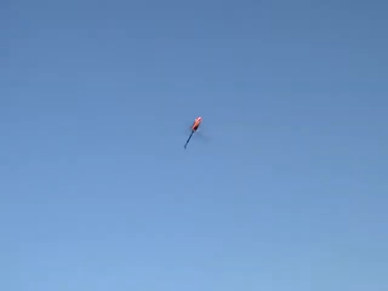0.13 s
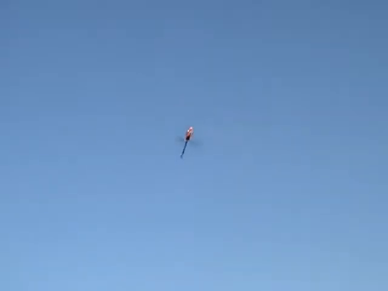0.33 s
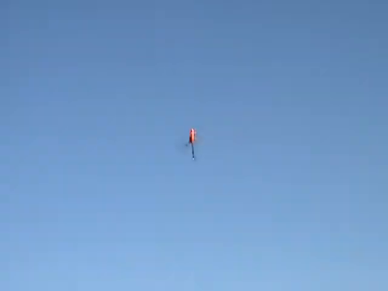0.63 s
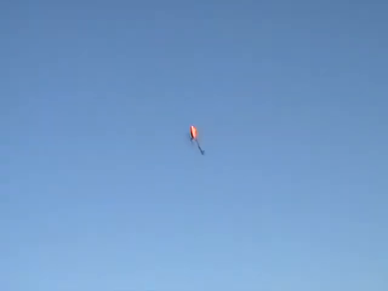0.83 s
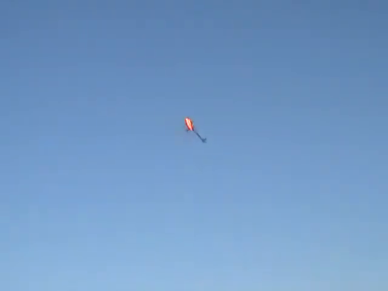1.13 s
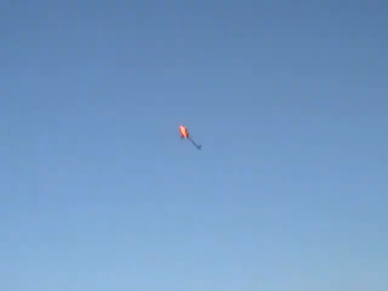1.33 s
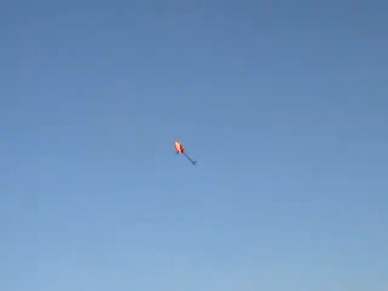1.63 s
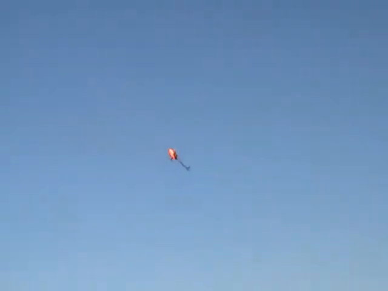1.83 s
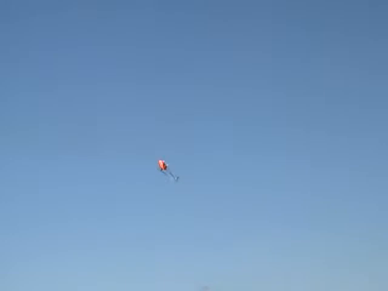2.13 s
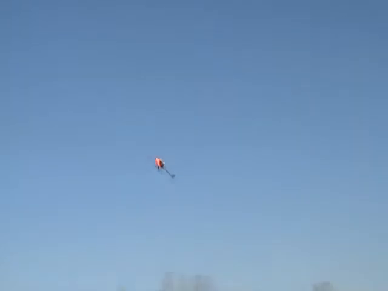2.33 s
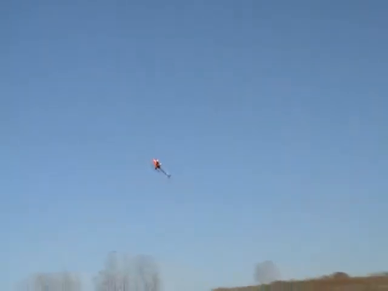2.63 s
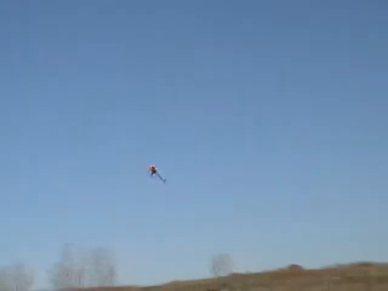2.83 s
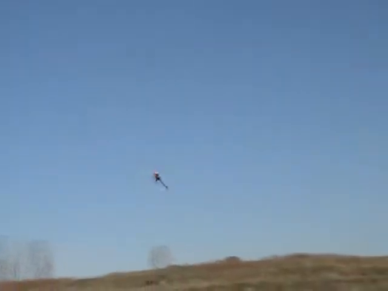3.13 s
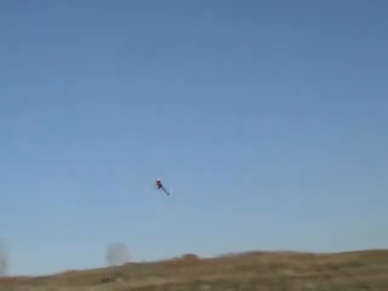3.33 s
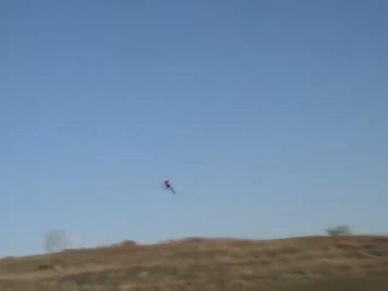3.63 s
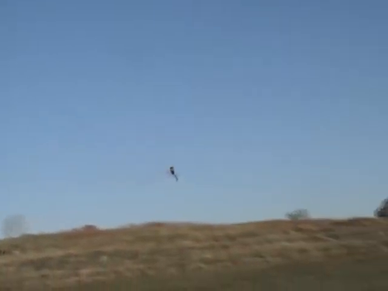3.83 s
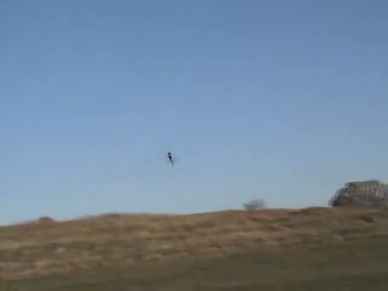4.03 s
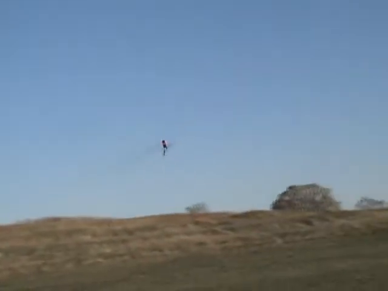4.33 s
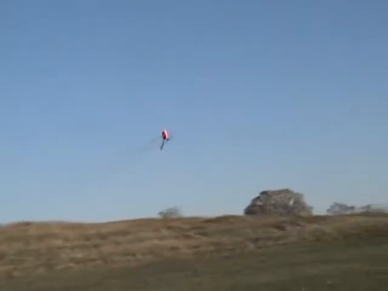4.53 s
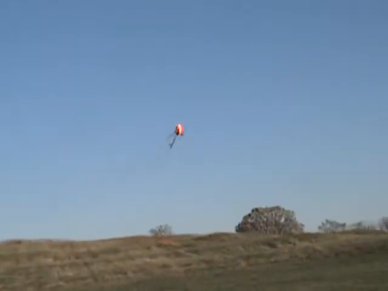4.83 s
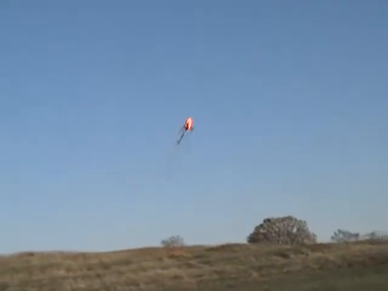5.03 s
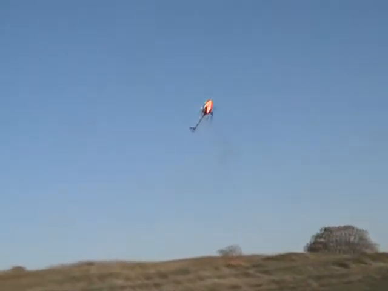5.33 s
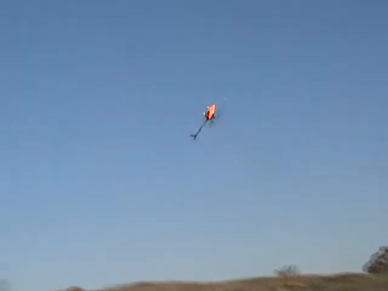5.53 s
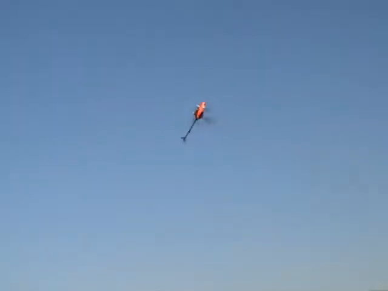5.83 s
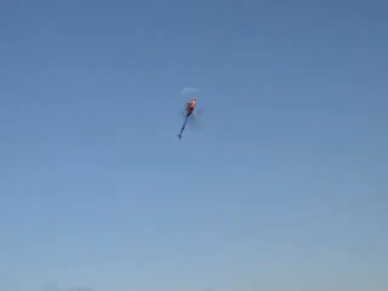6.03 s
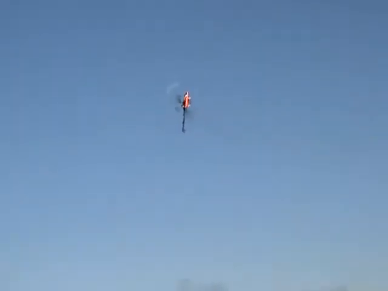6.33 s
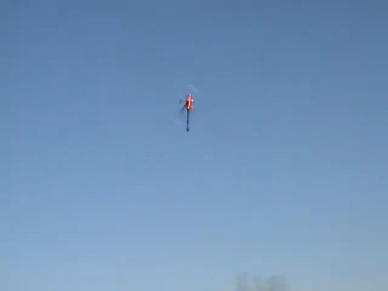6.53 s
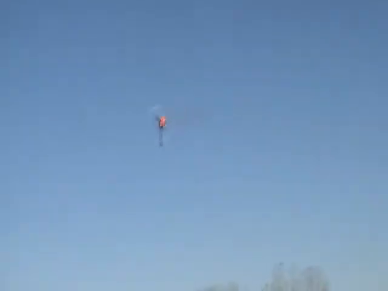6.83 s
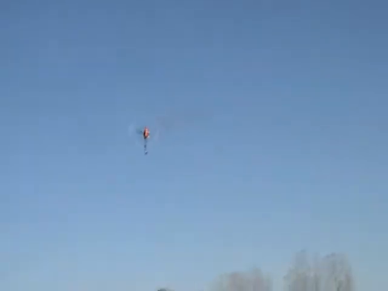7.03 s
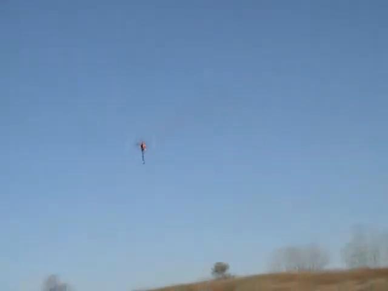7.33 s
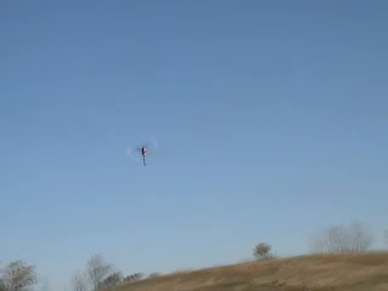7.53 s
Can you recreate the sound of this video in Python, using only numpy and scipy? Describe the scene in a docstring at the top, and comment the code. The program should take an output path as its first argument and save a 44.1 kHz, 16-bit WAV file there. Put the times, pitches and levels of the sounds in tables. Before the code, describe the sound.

A model helicopter's engine buzzes and its gears whine outdoors, the pitch sagging in a hard turn then recovering with slapping blades, under gusty wind rumble.

```python
"""A glow-fuel model helicopter flies over a grass field in wind; one crankshaft speed drives all its periodic tones.
It first descends, so its ground echo shortens until 3.9 s, while the wind drops; then it climbs and the echo lengthens.
Near 5 s the crankshaft is fastest and the exhaust pulses, with their rasp, tones and hiss, have their sharpest edge.
Near 6.6 s the speed sags as the blades bite the air in a hard turn; wind has returned to the microphone.
As the speed recovers, the wash of the rotor slaps hardest, near 7.3 s; gear teeth whine throughout."""
import sys
import numpy as np
from scipy.fft import rfft, irfft, next_fast_len
from scipy.io import wavfile
from scipy.ndimage import uniform_filter1d, map_coordinates

SR = 44100
rng = np.random.default_rng(int(sys.argv[2]) if len(sys.argv) > 2 else 0)


def materialize(psi):
    """Save the field psi as 16-bit PCM at rate SR to the path in sys.argv[1].

    A 1-D psi becomes a single channel; in a 2-D psi each row is a channel.
    """
    bounded = np.clip(np.atleast_2d(psi).T, -1, 1)
    quanta = np.round(bounded * 32767).astype(np.int16)
    wavfile.write(sys.argv[1], SR, quanta)


N = 339129

# turns per crankshaft turn of each rotor, teeth on the pinion, crankshaft speed in cruise [Hz]
MAIN_RATIO, TAIL_RATIO, TEETH, CRUISE_HZ = 2 / 17, 9 / 17, 10, 294.6


def amp(db):
    """Decibel law: level in dB to amplitude ratio."""
    return 10 ** (np.asarray(db) / 20)


def unit(x):
    """Normalization: scale to an rms of 1."""
    return x / np.sqrt(np.mean(x ** 2) + 1e-20)


def along(points, hz):
    """Logarithmic frequency scale: read (frequency [Hz], value) points at hz."""
    f, v = np.transpose(points)
    return np.interp(np.log(hz + 1), np.log(f + 1), v)


def course(points):
    """Linear interpolation in time: (time [s], value) points to one value per sample."""
    s, v = np.transpose(points)
    return np.interp(np.arange(N) / SR, s, v)


def level(points):
    """Amplitude envelope: gain from (time [s], level [dB]) points."""
    return amp(course(points))


def wobble(rate):
    """Band-limited fluctuation: a smooth random curve with rate knots a second."""
    coarse = np.arange(0, N + 32, 32)  # every 32nd sample is enough for a slow curve
    knots = rng.standard_normal(int(N * rate / SR) + 4)
    curve = map_coordinates(knots, [coarse * rate / SR], mode="nearest")
    return np.interp(np.arange(N), coarse, curve)


def filtered(x, response):
    """Linear filtering: multiply the spectrum of x by a response of frequency."""
    m = next_fast_len(N + SR // 4)
    return irfft(rfft(x, m) * response(np.fft.rfftfreq(m, 1 / SR)), m)[..., :N]


def noise(spectrum):
    """Spectral shaping: white noise coloured by (frequency [Hz], level [dB]), rms 1."""
    return unit(filtered(rng.standard_normal(N), lambda hz: amp(along(spectrum, hz))))


def partials(angle, table, fade_db):
    """Fourier synthesis: harmonics of a turning part, each fading on its own in the moving air."""
    total = 0
    for k, db in table:
        gain = amp(db + fade_db * wobble(4.03))
        total = total + gain * np.cos(k * angle + rng.uniform(0, 2 * np.pi))
    return unit(total)


def bursts(angle, share, sharpness):
    """Periodic amplitude modulation: mean power 1, a share of it gathered in one burst per cycle."""
    peak = np.exp(sharpness * (np.cos(angle) - 1))
    share = np.clip(share, 0, 1)
    return np.sqrt(1 - share + share * peak / peak.mean())


# wind buffeting: (time [s], level [dB])
WIND_LEVEL = [(0, -18.5), (.7, -21), (1.4, -20), (1.62, -17), (1.92, -20.5), (2.2, -32.5), (2.38, -40),
              (2.55, -29), (2.78, -33), (3, -23.5), (3.45, -29), (3.8, -47), (4.05, -38), (4.7, -57.5),
              (5.2, -43), (5.58, -43.5), (5.72, -34), (6.05, -22), (6.5, -26), (6.75, -14.5), (7.2, -20.5),
              (7.69, -12)]
# relative spectra of the gust eddies and of the steady breeze: (frequency [Hz], level per Hz [dB])
EDDY_SPECTRUM = [(15, -38), (35, -17.5), (60, -6.5), (100, 1), (160, 2), (250, -6), (400, -12), (700, -21),
                 (1500, -37.5), (6000, -69.5)]
BREEZE_SPECTRUM = [(15, -11.5), (30, -6.5), (55, 2), (100, 1.5), (170, -13), (400, -36.5), (2000, -68.5)]
GUST_DB, GUSTS_PER_S = 1.2, 6.7  # quick gusts on top of the wind


def wind():
    """Turbulent pressure: a breeze rumbles on both ports, gusts add brighter eddies, harder on the right."""
    buffet_db = course(WIND_LEVEL) + GUST_DB * wobble(GUSTS_PER_S)

    def eddies():
        """Intermittent turbulence: eddy noise that swells and fades at random."""
        return amp(buffet_db + 1) * unit(noise(EDDY_SPECTRUM) * amp(1.8 * wobble(22)))

    # the deep rumble follows the gusts only partly
    breeze = amp(0.5 * buffet_db - 18.0) * noise(BREEZE_SPECTRUM)
    right = eddies() + breeze
    # phase lead of the left port: (frequency [Hz], phase [rad])
    lead = [(40, 1.2), (130, 2.02), (400, 1.78)]
    left = filtered(right, lambda hz: np.exp(1j * along(lead, hz)))
    return np.array([amp(-7.0) * left + amp(-11.0) * eddies(), right])


# delay of the ground echo: (time [s], delay [s])
ECHO_DELAY = [(0, 0.00415), (.25, 0.00394), (1, 0.003416), (2, 0.00247), (3, 0.001615), (3.9, 0.001057),
              (4.3, 0.001136), (4.8, 0.00141), (5.3, 0.001884), (5.8, 0.002597), (6.5, 0.003125),
              (7.69, 0.002105)]


def over_ground(x, reflection):
    """Comb interference: the ground returns a copy, later the higher the helicopter; grass dulls it."""
    grass = [(1800, 0), (3500, -5.0), (6000, -8)]  # (frequency [Hz], level [dB])
    dull = filtered(x, lambda hz: amp(along(grass, hz)))
    echo = np.interp(np.arange(N) - course(ECHO_DELAY) * SR, np.arange(N), dull)
    return x + reflection * echo


# left port over right port: (frequency [Hz], level difference [dB])
PORT_LEVEL = [(60, 9), (130, 21.5), (250, 19.5), (400, 28), (750, 13.5), (1100, 10), (1500, 5.5),
              (2100, 5.5), (3000, 0.5), (3700, 6), (4500, 0.5), (6100, -1)]
# phase lead of the left port: (frequency [Hz], phase [rad])
PORT_PHASE = [(60, 0), (260, -2.9), (520, -2.3), (860, -1.6), (1400, -1.5), (2000, -1.15), (2700, -1.2),
              (3400, -.6), (3900, -1.1), (4600, -.7), (6300, -.68)]


def at_ports(x):
    """Interaural-like differences: two ports hear the same sound with different level and phase."""
    def response(hz):
        """Transfer functions: left and right, with a mean of 1."""
        ratio = amp(along(PORT_LEVEL, hz)) * np.exp(1j * along(PORT_PHASE, hz))
        return 2 * np.array([ratio, np.ones_like(ratio)]) / (1 + ratio)
    return filtered(x, response)


# brief flares (+) and fades (-), before each layer scales them: (time [s], width at 1/e [s], level [dB])
FLARES = [(1.45, .06, -4), (1.665, 0.14, 6), (2.39, .06, -5), (2.64, 0.11, 3), (2.751, 0.046, -4.5),
          (2.94, 0.064, 5), (3.113, 0.087, -7), (3.18, 0.064, 2), (3.304, 0.1, -4.5), (3.588, 0.052, 2.5),
          (3.681, 0.059, -5), (3.774, 0.092, 5.5), (3.879, 0.065, -3.5), (3.978, 0.059, 4.5),
          (4.337, 0.056, 4.5), (4.541, 0.066, 6), (5.527, 0.21, 5.5)]
FLICKER_DB, FLICKERS_PER_S = 1.1, 9


def flares():
    """Fluctuation in moving air: bell-shaped rises and fades of whine and hiss in dB, plus a flicker."""
    t = np.arange(N) / SR
    brief = sum(db * np.exp(-(2 * (t - s) / width) ** 2) for s, width, db in FLARES)
    return brief + FLICKER_DB * wobble(FLICKERS_PER_S)


# crankshaft speed as heard, before inertia smooths it: (time [s], speed [Hz])
SPEED = [(0.0, 292.4), (0.2, 295.2), (0.4, 294.8), (1.04, 284.6), (1.28, 283.3), (2.12, 287.3), (2.56, 285),
         (3.36, 286), (4.12, 290), (4.64, 298.4), (4.84, 300.7), (5.08, 302.8), (5.28, 300.4),
         (5.52, 298.3), (5.68, 296.6), (5.92, 291.7), (6.04, 288.4), (6.16, 282.7), (6.36, 263),
         (6.44, 255.4), (6.52, 252.3), (6.6, 250.8), (6.68, 253.1), (6.72, 254.4), (6.96, 272.1),
         (7.16, 282.7), (7.44, 289.9), (7.68, 291)]
INERTIA_S = 0.075  # the rotor's mass rounds off every change of speed
HUNT_HZ, HUNTS_PER_S = 0.3522, 6  # the speed hunts a little about its course


def crankshaft_speed():
    """Rotational inertia: a smoothed course of speed in Hz, with slight hunting."""
    smooth = uniform_filter1d(course(SPEED), int(INERTIA_S * SR), mode="nearest")
    return smooth + HUNT_HZ * wobble(HUNTS_PER_S)


# bite of the main blades, over easy flight: (time [s], level [dB])
BITE = [(0, 3), (.33, 5.5), (.5, 10), (.95, -1), (1.4, -5.5), (2.6, -1.5), (3.25, 0.5), (3.55, 7), (4.2, 1),
        (4.6, 3.5), (5.15, -2), (5.6, 4), (6.1, 11), (6.55, 7), (7.13, 11.5), (7.27, 3.5), (7.52, 2),
        (7.69, -1.5)]
# share of the wash that comes in slaps: (time [s], share [1])
SLAP = [(0, 0.29), (.5, .3), (1.3, .12), (2.6, .12), (3.7, .42), (4.5, .45), (5.8, .17), (6.2, 0.29),
        (6.5, 0.67), (6.75, 0.53), (7, .72), (7.3, 1), (7.69, 0.29)]
# relative spectra of dull wash and bright swish: (frequency [Hz], level per Hz [dB])
WASH_SPECTRUM = [(60, -33), (200, -17.5), (330, -2.5), (470, -5), (680, 2), (820, -3), (980, -4),
                 (1300, -7), (2500, -47.5)]
SWISH_SPECTRUM = [(400, -29.5), (900, -17), (1150, 1.5), (1350, -1), (1750, -0.5), (2300, -4), (3000, -8.5),
                  (4200, -14), (7000, -33)]
# level in easy flight [dB] and growth [dB per dB of bite]
WASH_DB, WASH_GROWS, SWISH_DB, SWISH_GROWS = -35, 1.03, -30, 0.71
STALL_DB_PER_HZ = 0.06  # shift from swish to wash per Hz below cruising crankshaft speed
# main rotor at blade rate, at twice that, and overtones, beamed as the disc tilts: (time [s], level [dB])
THUMP = [(0, -43.5), (3.4, -47.5), (4.1, -59.5), (4.7, -54), (5.1, -47), (5.7, -44.5), (6.25, -33),
         (6.6, -40), (7.69, -44)]
THROB = [(0, -41.5), (2.4, -46.5), (3.6, -40.5), (5.6, -42.5), (6.3, -36), (7.69, -38.5)]
DRONE = [(0, -29.5), (.6, -40.5), (1.5, -45), (2.8, -56.5), (3.7, -48), (4.3, -38), (5.1, -40), (5.5, -38),
         (5.85, -30.5), (6.35, -28.5), (6.8, -37), (7.69, -37.5)]
# tail rotor at blade rate, and overtones, beamed as the disc tilts: (time [s], level [dB])
TAIL_HUM = [(0, -39), (.9, -43), (1.3, -41), (2.8, -50), (3.5, -43.5), (4.2, -36), (5.2, -43), (6.3, -36),
            (7.69, -39)]
TAIL_BUZZ = [(0, -42), (.6, -38.5), (1.2, -41.5), (2.1, -44), (3.1, -35.5), (4.3, -43), (4.9, -35.5),
             (5.4, -28), (6, -30), (6.7, -44), (7.1, -34), (7.69, -39)]
# relative overtones: (multiple of blade rate [1], level [dB])
MAIN_OVERTONES = [(3, -7.5), (4, -1), (5, 0.5), (6, -12.5), (7, -17.5)]
TAIL_OVERTONES = [(2, -0.5), (3, -6), (4, -1), (5, -6), (6, -6.5), (10, -8.5)]


def rotors(crank, speed):
    """Blade-passing radiation: two blades per rotor give a drone, a tail buzz and a throbbing wash."""
    blade = 2 * MAIN_RATIO * crank
    tail = 2 * TAIL_RATIO * crank
    tones = level(TAIL_HUM) * unit(np.cos(tail))
    tones += level(TAIL_BUZZ) * partials(tail, TAIL_OVERTONES, fade_db=1.5)
    tones += level(THUMP) * unit(np.cos(blade)) + level(THROB) * unit(np.cos(2 * blade))
    tones += level(DRONE) * partials(blade, MAIN_OVERTONES, fade_db=3.5)
    bite_db = course(BITE)
    # a rotor dragged below cruising speed trades bright swish for dull wash
    stall_db = STALL_DB_PER_HZ * np.maximum(CRUISE_HZ - speed, 0)
    # no two blades meet the wake equally hard
    strike = course(SLAP) * amp(1.1 * wobble(60))
    wash_gain = amp(WASH_DB + WASH_GROWS * bite_db + stall_db)
    wash = wash_gain * noise(WASH_SPECTRUM) * bursts(blade, strike, sharpness=8.5)
    swish_gain = amp(SWISH_DB + SWISH_GROWS * bite_db - stall_db + 1.1 * wobble(8))
    swish = swish_gain * noise(SWISH_SPECTRUM) * bursts(blade, 0.45 * strike, sharpness=10.0)
    # the swish also pulses once per crankshaft turn
    return tones + wash + swish * bursts(crank, share=0.24, sharpness=5.7)


# exhaust hiss, before the 6.5 dB added in jet: (time [s], level [dB])
HISS_LEVEL = [(0, -29.5), (.45, -30.5), (1, -37), (1.4, -35.5), (1.8, -30.5), (2.4, -32.5), (3.5, -29),
              (4.2, -35.5), (4.65, -30.5), (5.1, -32.5), (5.6, -26.5), (6.2, -29), (6.7, -33), (7.3, -37),
              (7.69, -37)]
# relative spectrum of the hiss: (frequency [Hz], level per Hz [dB])
HISS_SPECTRUM = [(1200, -25), (2400, -6), (3200, 1), (3700, -2), (4400, 0.5), (5100, -2.5), (5700, 4.5),
                 (6300, -1), (7200, 1.5), (12000, -5)]
# part that repeats with every pair of firings, over the rest: (time [s], level [dB])
REGULAR = [(0, -13.5), (1, -7.5), (2.2, -7.5), (3.2, -6), (4, -12), (4.7, -4), (5.4, -5), (6.2, -7.5),
           (7.69, -10.5)]
FLARE_IN_HISS = 0.65  # the hiss takes this much of each flare


def jet(crank, flare_db):
    """Pulsed jet noise: gas hisses out in a puff each turn; what the puffs share makes a fine buzz."""
    hiss_db = course(HISS_LEVEL) + FLARE_IN_HISS * flare_db
    puffs = bursts(crank, share=0.1, sharpness=1.0) * bursts(crank / 2, share=0.27, sharpness=1.6)
    orders = np.arange(15, 46) / 2  # multiples of crankshaft speed
    buzz_table = [(k, along(HISS_SPECTRUM, k * CRUISE_HZ)) for k in orders]
    buzz = partials(crank + 0.015 * wobble(60), buzz_table, fade_db=2.5)
    regular = level(REGULAR)
    mixed = (noise(HISS_SPECTRUM) * puffs + regular * buzz) / np.hypot(1, regular)
    return amp(hiss_db + 6.5) * mixed


# pinion on the main gear, at the tooth rate and at its overtones: (time [s], level [dB])
MESH = [(0, -31), (.48, -38), (.66, -30), (.82, -43), (1.4, -39.5), (1.62, -32.5), (2.55, -39), (2.85, -57),
        (3.4, -31.5), (3.76, -25), (4.55, -27.5), (5.2, -38.5), (5.6, -21.5), (5.76, -33.5), (6.38, -30.5),
        (6.56, -45.5), (6.9, -44), (7.08, -33), (7.34, -28.5), (7.46, -46), (7.6, -29.5), (7.69, -41)]
WHINE = [(0, -29.5), (.48, -29), (.66, -48), (.8, -28), (1.28, -32.5), (1.6, -29.5), (2.1, -37.5),
         (2.86, -24), (3.5, -19.5), (4.16, -18), (4.3, -29), (4.45, -29), (4.9, -16.5), (5.35, -25.5),
         (5.9, -27), (6.55, -27), (6.96, -23.5), (7.08, -29), (7.29, -26), (7.38, -44), (7.69, -43.5)]
# swing of the tooth phase by each firing, and by the limp of strong and weak ones: (time [s], phase [rad])
JERK = [(0, .35), (2.2, 0.12), (2.9, 0.053), (4.2, 0.067), (5, 0.17), (5.5, 0.46), (6.1, 0.45), (6.3, .6),
        (6.42, .55), (6.55, .36), (6.8, .4), (7.2, .15), (7.69, .15)]
LIMP = [(0, 0.35), (2.9, 0.16), (3.8, 0.13), (4.3, 0.19), (4.85, 0.34), (5.5, 0.41), (6.3, .14), (7, 0.18),
        (7.69, .25)]
# rattle of the teeth in their backlash: (time [s], phase [rad])
BACKLASH = [(0, 0.54), (1, 0.49), (2.6, 0.23), (5.2, 0.31), (5.9, .5), (6.2, 0.61), (6.4, .42), (6.55, .2),
            (6.95, .22), (7.07, .5), (7.25, 0.27)]
# tightening (+) or slackening (-) of the tooth contact by each firing: (time [s], fraction [1])
LOAD = [(0, .5), (.6, .1), (5.1, 0.18), (5.7, -0.045), (6.05, .1), (6.3, 0.43), (6.45, .5), (6.6, -0.49),
        (6.85, -0.26), (7, 0.27), (7.69, -0.27)]
FADE_DEEPER = 1.54  # a pure tone drops out deeper than the hiss does


def gears(crank, flare_db):
    """Gear-mesh modulation: runout, firing jerks and backlash sway the tooth phase; load varies its level."""
    jerk, limp = course(JERK), course(LIMP)
    runout = .2 * np.sin(MAIN_RATIO * crank)  # the main gear runs out of true
    sway = runout + limp * np.sin(crank / 2) + jerk * np.sin(crank)
    backlash = course(BACKLASH) * wobble(55) + .2 * wobble(300)
    mesh = TEETH * crank + sway + backlash
    overtones = np.cos(2 * mesh) + amp(-3) * np.cos(3 * mesh) + amp(-6) * np.cos(4 * mesh)
    chatter = unit(amp(1.6 * wobble(260)))
    first_db = course(MESH) + 1.4 * wobble(14)
    flare_in_whine = np.minimum(flare_db, FADE_DEEPER * flare_db)
    second_db = course(WHINE) + flare_in_whine + 1.7 * wobble(25)
    whine = amp(first_db) * unit(np.cos(mesh)) + amp(second_db) * unit(overtones) * chatter
    load = 1 + course(LOAD) * np.cos(crank) - .3 * limp * np.cos(crank / 2)
    flutter = unit(amp(1.03 * wobble(50)))
    return whine * load * flutter * bursts(MAIN_RATIO * crank, share=0.17, sharpness=0.9)


# muffler tones, each beamed its own way as the body turns: (time [s], level [dB])
THUD = [(0, -33), (.75, -39), (1.7, -29.5), (2.5, -47.5), (3.4, -43), (5.6, -34.5), (6.3, -25.5),
        (6.6, -40), (7.69, -34.5)]
HUM = [(0, -32), (.9, -34), (2.1, -30), (2.7, -31), (3.5, -27.5), (4.6, -44.5), (4.8, -36), (5.5, -33),
       (5.75, -27), (6.2, -21.5), (6.9, -30), (7.25, -38.5), (7.69, -33.5)]
BARK = [(0, -34), (.9, -54), (1.7, -37.5), (2.3, -36.5), (2.9, -33.5), (3.75, -33), (4.1, -39),
        (4.4, -43.5), (4.7, -34), (5.1, -33.5), (5.4, -33), (5.65, -28), (5.95, -28.5), (6.6, -45.5),
        (6.9, -33), (7.15, -28.5), (7.4, -45), (7.69, -46)]  # from the limp of the firings
GROWL = [(0, -44), (.7, -47), (1.3, -60), (1.5, -43), (2.6, -40.5), (3.05, -42.5), (3.5, -42), (5.8, -35),
         (6.3, -31), (7.12, -32), (7.69, -47.5)]
HOWL = [(0, -23), (.47, -17.5), (.6, -25), (.675, -35), (.71, -23), (1.36, -39.5), (1.53, -24), (2.38, -23),
        (2.65, -29.5), (3.15, -26.5), (3.45, -19), (4.08, -28), (4.7, -17), (5.15, -25), (6, -29.5),
        (6.9, -37), (7.13, -27.5), (7.5, -31.5), (7.69, -44)]
BRAY = [(0, -33), (.5, -33.5), (.7, -53), (.82, -37.5), (1.1, -41), (1.22, -57), (1.4, -34.5), (3.2, -32),
        (3.6, -25), (4.15, -30), (4.55, -32), (4.9, -36.5), (5.1, -28), (5.55, -32.5), (6.05, -35),
        (6.25, -30), (6.62, -30), (6.75, -39.5), (7.15, -40.5), (7.3, -34), (7.69, -33.5)]
RING = [(0, -41.5), (.55, -53), (1, -34.5), (1.25, -40), (2.7, -39), (3, -31), (3.6, -27.5), (4.3, -29.5),
        (4.7, -24.5), (5.1, -30.5), (5.8, -29), (6.3, -24.5), (6.5, -33.5), (7, -23.5), (7.25, -38.5),
        (7.69, -44)]
SNARL = [(0, -36.5), (.62, -44.5), (1.04, -52), (1.3, -46.5), (2.9, -45), (3.14, -55.5), (3.5, -36),
         (3.8, -30), (4.2, -41.5), (4.5, -36), (6.7, -38), (7, -33), (7.3, -35), (7.69, -60.5)]
BLARE = [(0, -37), (1, -54), (1.7, -38.5), (2.3, -47), (4.3, -51), (4.8, -35.5), (5.25, -30), (5.6, -36),
         (6, -42), (7.69, -50.5)]  # high, under full throttle
SHRILL = [(0, -48), (.5, -54), (.73, -42), (1.15, -59), (2.2, -42), (3.4, -42.5), (4.35, -58), (4.7, -30.5),
          (5.15, -28), (5.55, -31), (6, -43), (6.3, -49), (7, -46.5), (7.3, -38.5), (7.69, -44)]
# their frequencies in the same order: multiple of the firing rate, one firing per turn [1]
TONE_ORDERS = 1, 2, 2.5, 3, 4, 5, 6, 8, 9, 11
# exhaust rasp with its edge: (time [s], level [dB])
RASP = [(0, -31), (.6, -38), (1.1, -43), (1.75, -30.5), (3.2, -33), (3.7, -29.5), (4.1, -37), (4.5, -30.5),
        (5, -26), (5.85, -26), (6.4, -31.5), (7.15, -34), (7.69, -43)]
# edge over rasp, sharper as the throttle opens: (time [s], level [dB])
THROTTLE = [(0, -3.5), (2.3, -3.5), (4, -8.5), (4.6, 3), (5, 6), (5.6, 3), (5.9, -8), (7.69, -4.5)]
# relative partials of the rasp and of the sharp pulse edge: (multiple of crankshaft speed [1], level [dB])
FIRING = [(.5, -15.5), (1.5, -15.5), (3.5, -13), (4.5, -5.5), (5.5, -15.5), (6.5, -10), (7, -11.5),
          (7.5, -12)]  # halves come from alternating strong and weak firings
EDGE = [(8.5, -1.5), (9.5, 4.5), (10.5, -5), (11.5, -5.5), (12, -2.5), (12.5, -10.5), (13, -15),
        (13.5, -10.5), (14, -12.5), (14.5, -8.5), (15, -2), (15.5, -6.5), (16, -2.5), (17, -8), (18, -21.5)]


def exhaust(crank):
    """Harmonic pulse radiation: muffler tones over a rasp of uneven firings, edged under throttle."""
    angle = crank + 0.0077 * wobble(60)
    tones = 0
    for k, tone in zip(TONE_ORDERS, (THUD, HUM, BARK, GROWL, HOWL, BRAY, RING, SNARL, BLARE, SHRILL)):
        gain = amp(course(tone) + 0.98 * wobble(25) + 0.57 * wobble(6))
        tones = tones + gain * unit(np.cos(k * angle + rng.uniform(0, 2 * np.pi)))
    # the throttle moves power from the low rasp into the edge
    edge = level(THROTTLE)
    rasp = partials(angle, FIRING, fade_db=2.0) + edge * partials(angle, EDGE, fade_db=3.5)
    return tones + level(RASP) * rasp / np.hypot(1, edge)


def scene():
    """Superposition: the helicopter with its ground echo, and wind at the ports."""
    speed = crankshaft_speed()
    crank = 2 * np.pi * np.cumsum(speed) / SR
    flare_db = flares()
    helicopter = rotors(crank, speed) + jet(crank, flare_db) + gears(crank, flare_db) + exhaust(crank)
    return wind() + at_ports(over_ground(helicopter, reflection=0.35))


# microphone response: (frequency [Hz], level [dB])
MICROPHONE = [(20, -0.5), (6050, 0.5), (6400, -2.5), (6700, -10.5), (7050, -29), (9000, -32), (12000, -40)]
TOP_HZ = 11800  # nothing passes above


def record(dry):
    """Band limiting and overload: the microphone's treble falls away steeply; peaks beyond 1 clip."""
    coloured = filtered(dry, lambda hz: amp(along(MICROPHONE, hz)))
    clipped = np.clip(coloured, -1, 1)
    return filtered(clipped, lambda hz: hz < TOP_HZ)


dry = scene()
out = record(dry)
materialize(out)
```